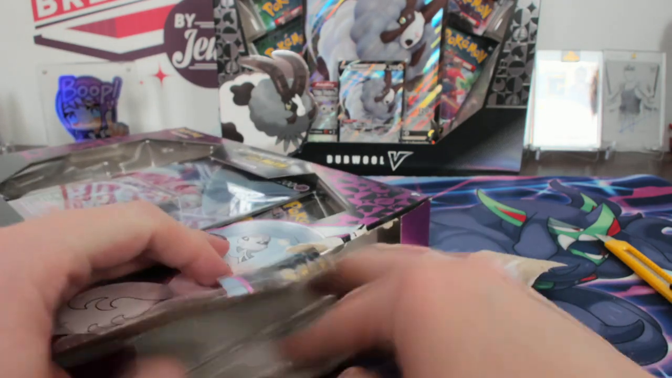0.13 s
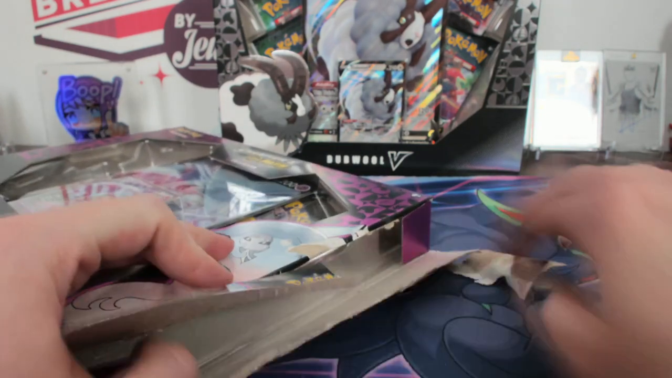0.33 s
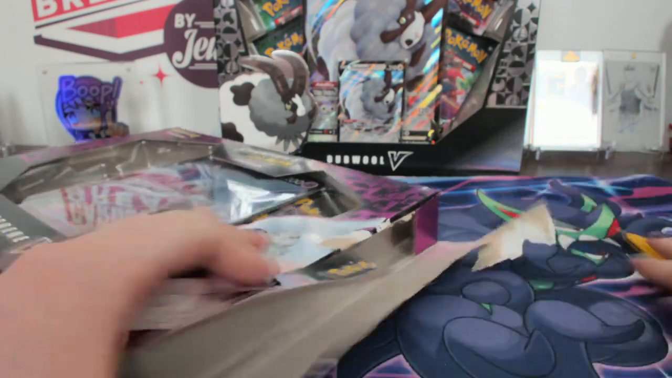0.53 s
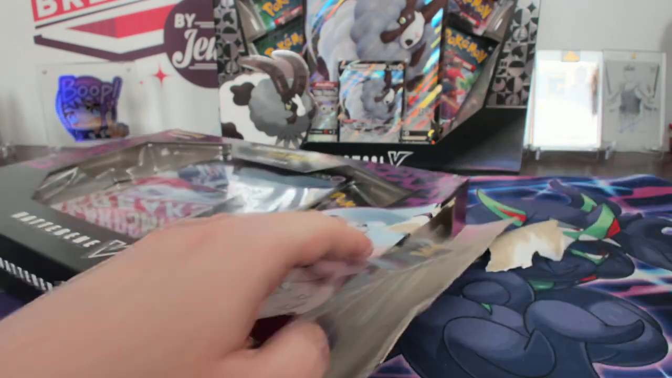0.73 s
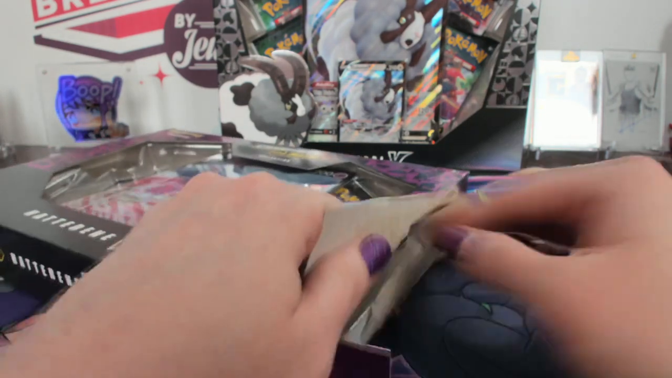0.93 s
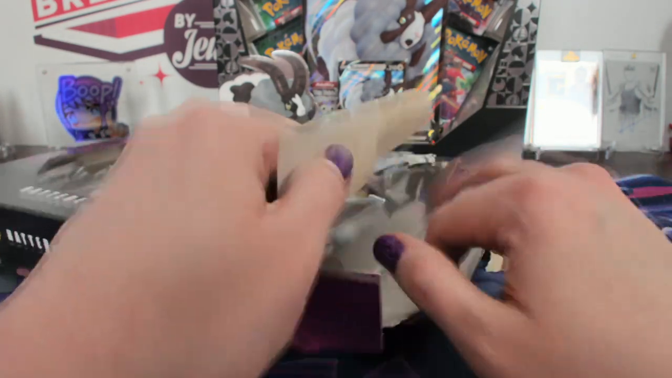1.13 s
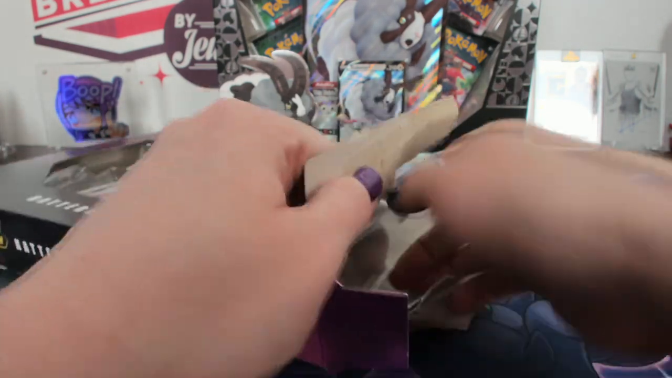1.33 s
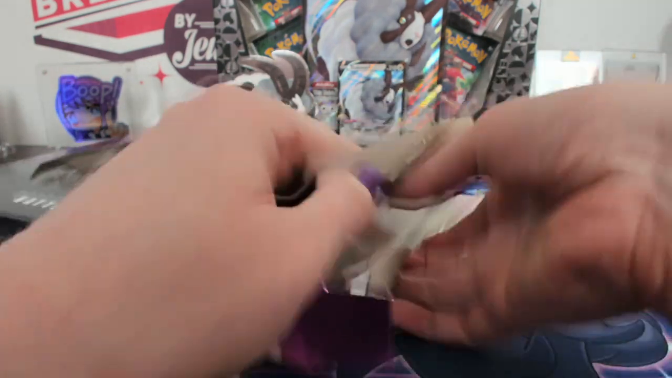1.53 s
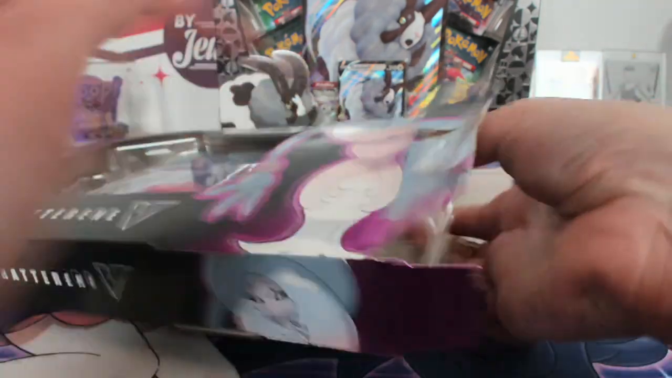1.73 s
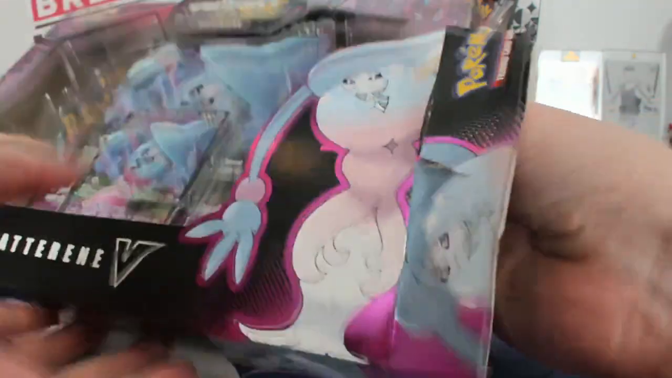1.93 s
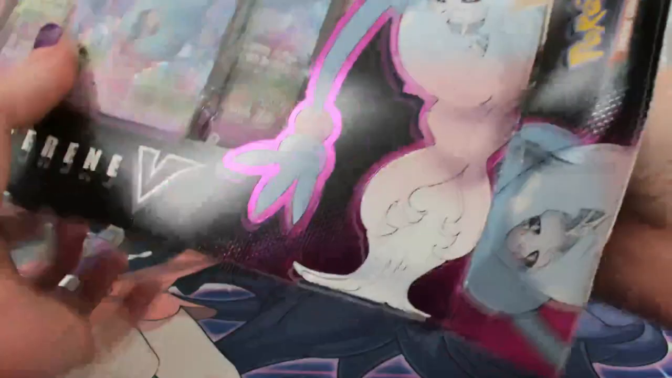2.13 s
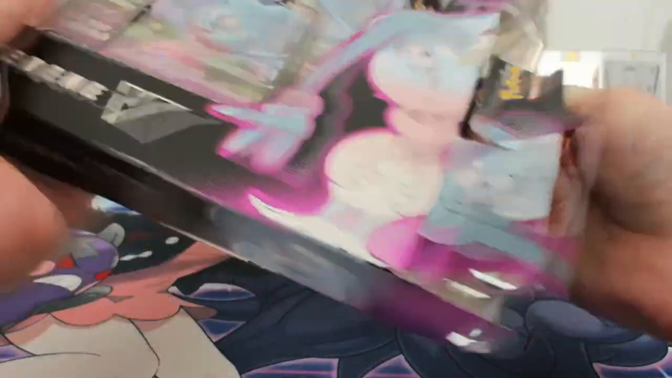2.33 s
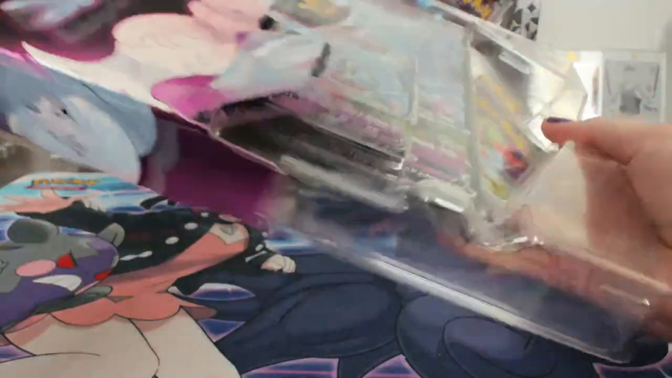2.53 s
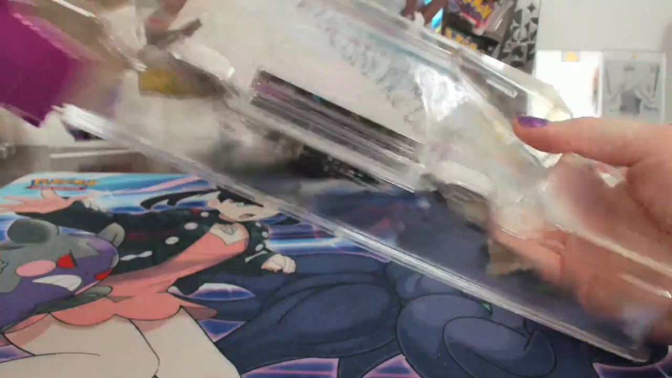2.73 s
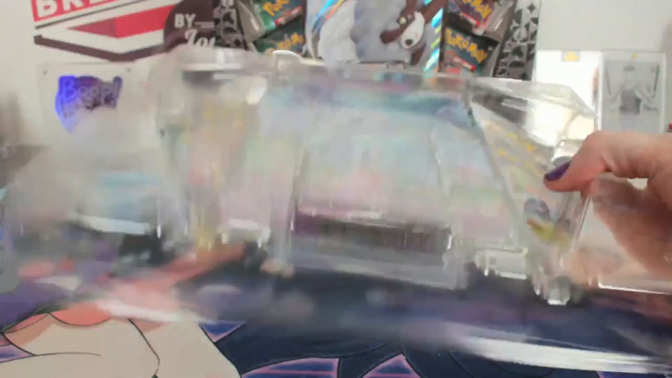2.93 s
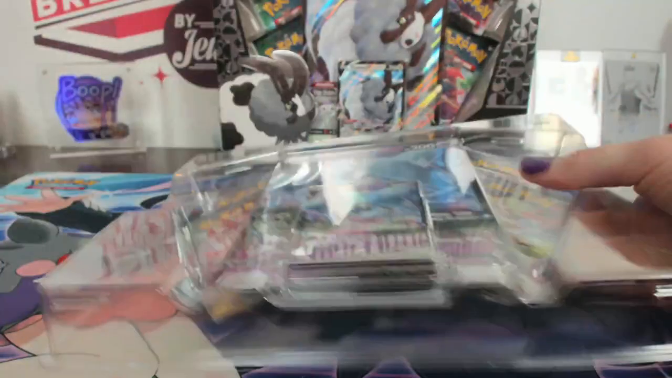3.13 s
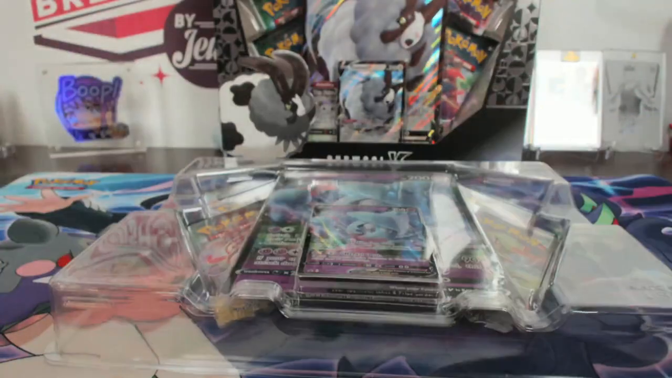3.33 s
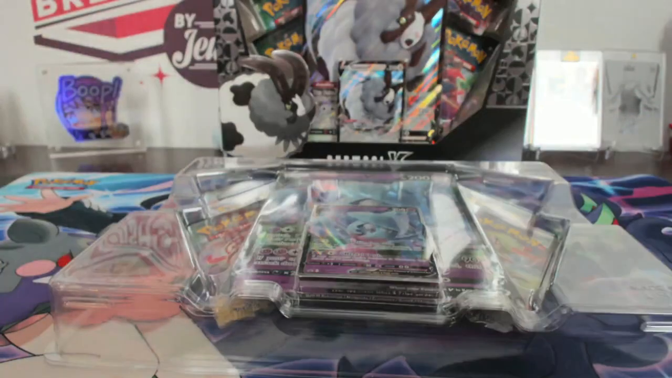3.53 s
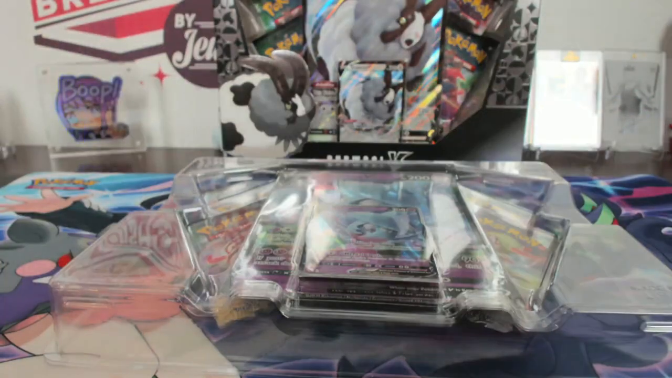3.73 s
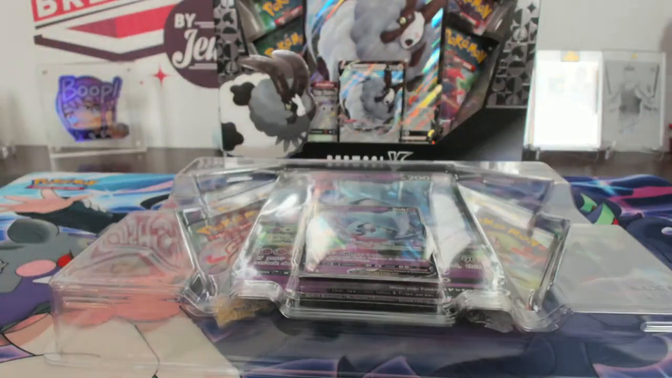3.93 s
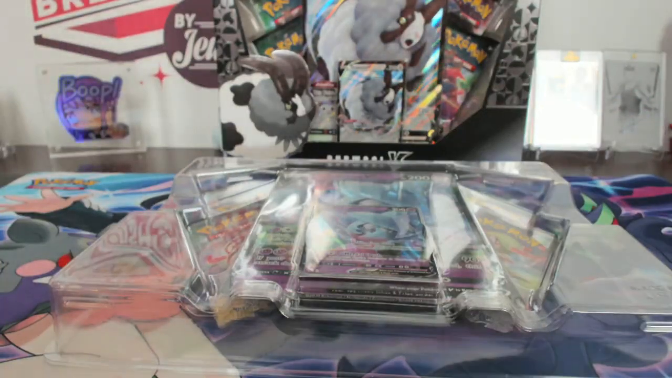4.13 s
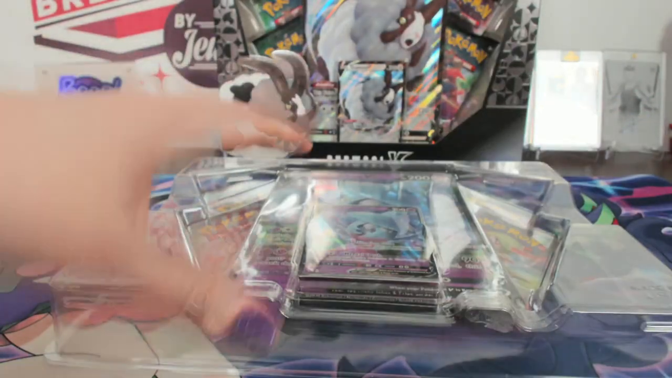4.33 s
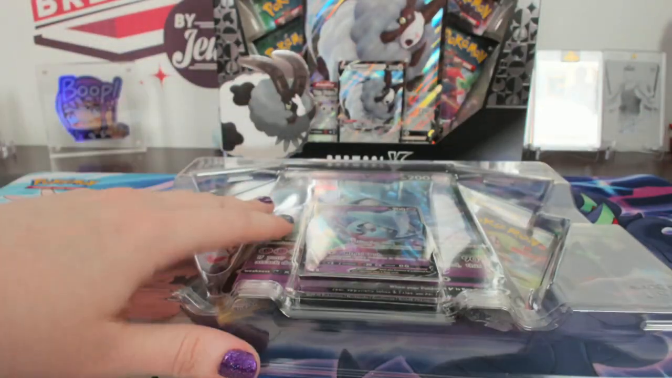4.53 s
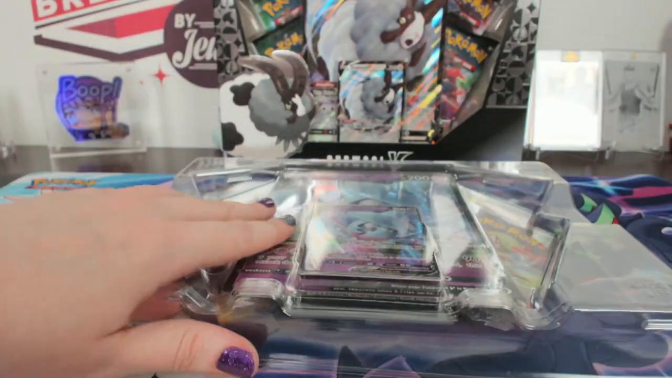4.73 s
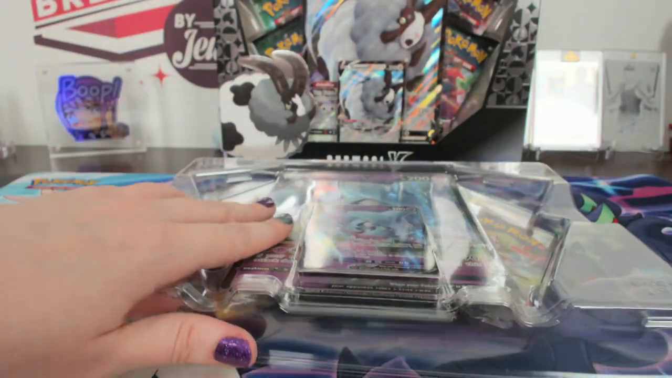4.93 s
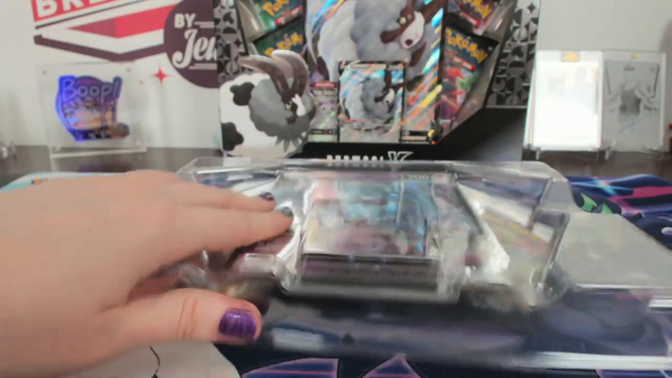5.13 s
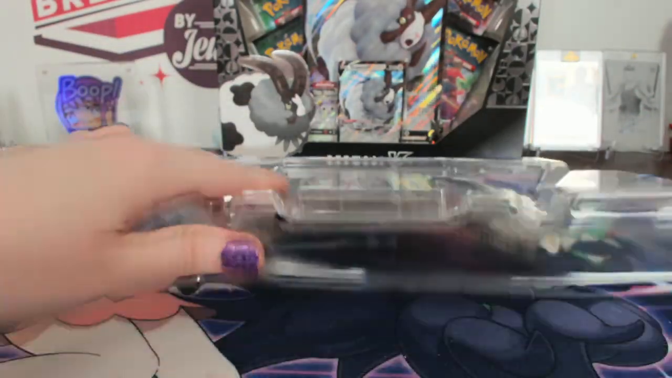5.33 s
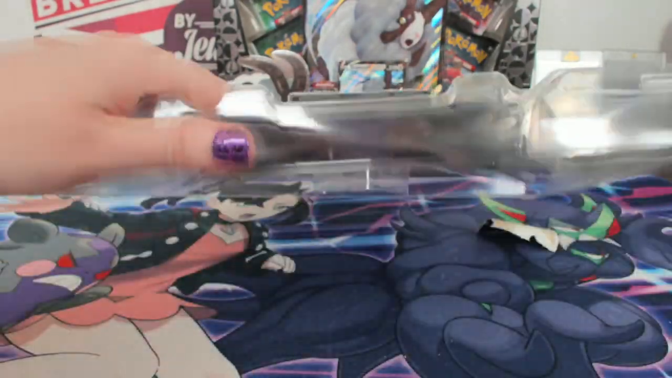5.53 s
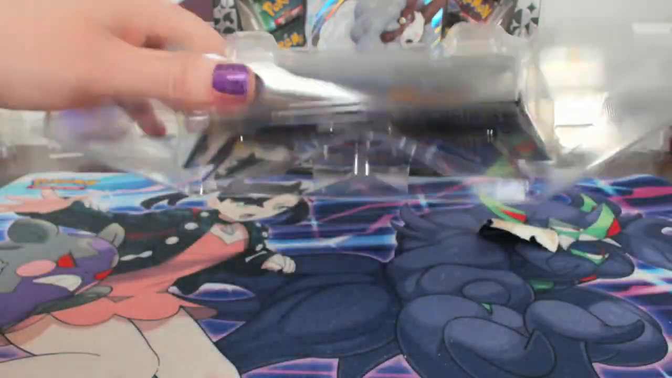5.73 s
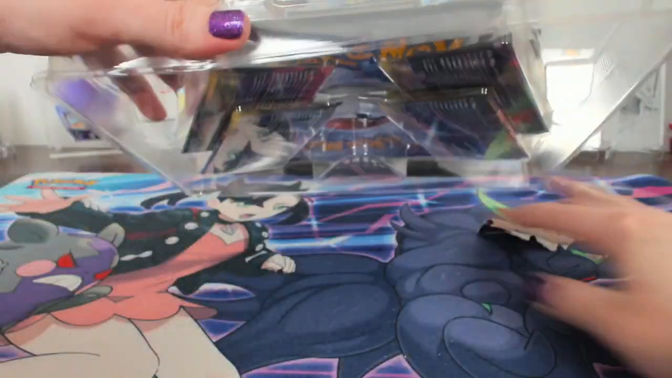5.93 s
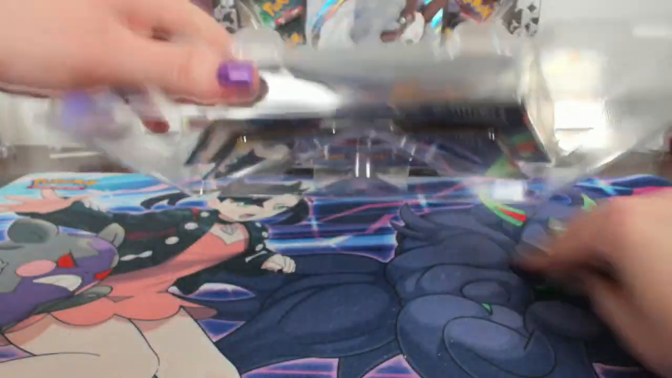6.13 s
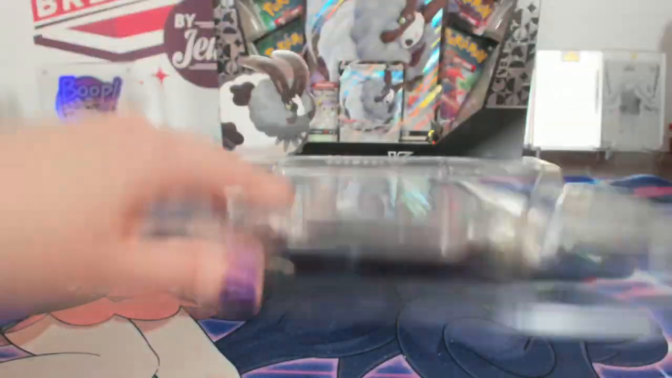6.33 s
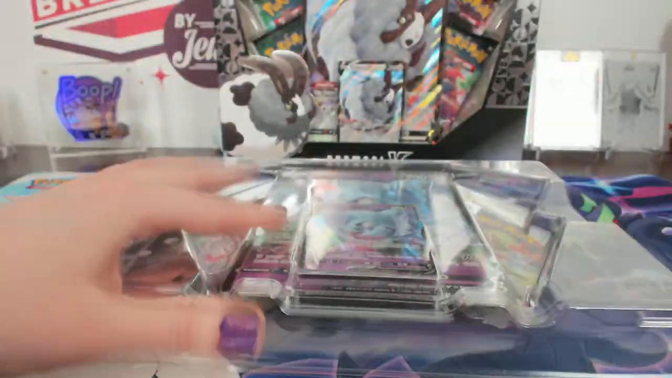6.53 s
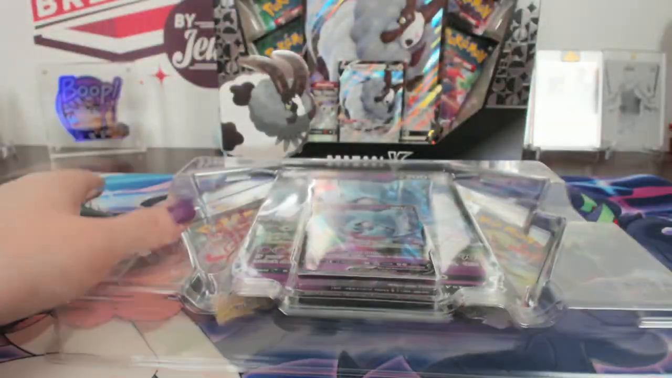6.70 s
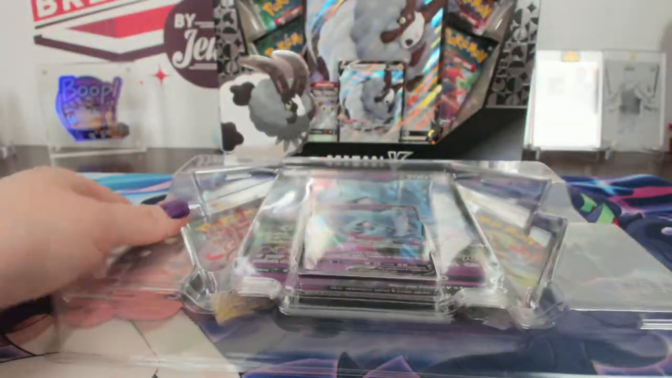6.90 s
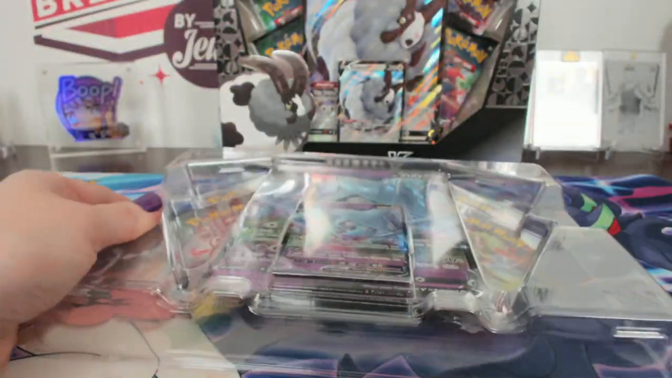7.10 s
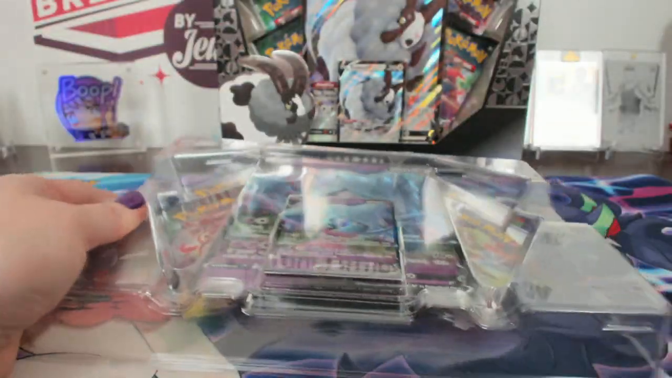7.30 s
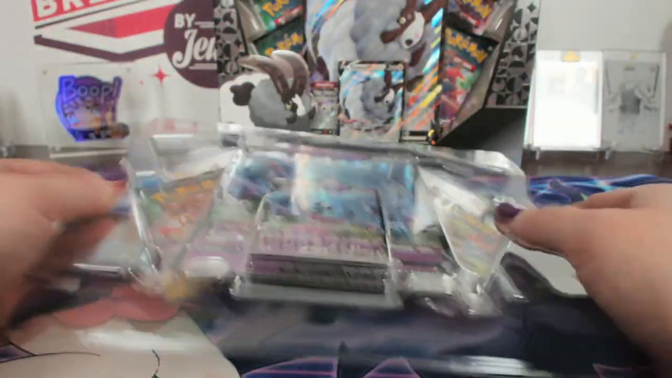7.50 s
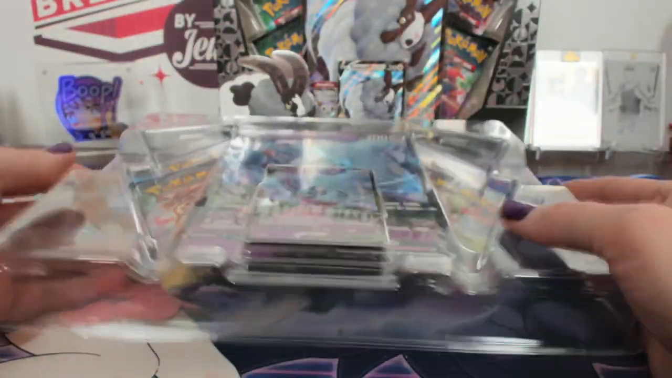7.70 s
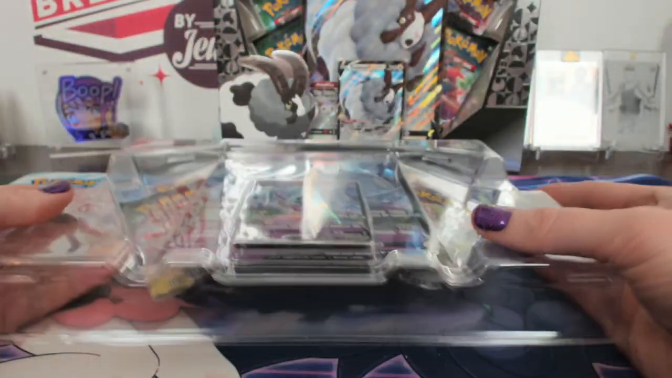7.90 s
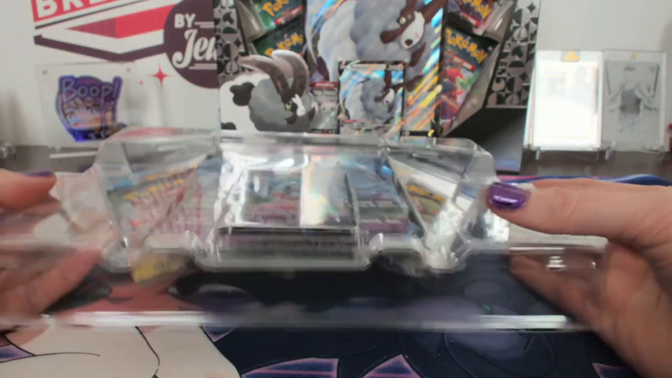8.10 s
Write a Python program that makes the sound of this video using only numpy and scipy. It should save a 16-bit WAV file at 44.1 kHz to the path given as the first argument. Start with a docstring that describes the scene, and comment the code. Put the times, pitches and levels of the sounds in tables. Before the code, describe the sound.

Close handling of packaging: glued card crackles, stiff board pops, a plastic tray rasps free, drops on a padded table, then crinkles under fingers.

```python
"""Small room, padded table, one close microphone: a cardboard box is opened.
Its glued flap peels as a dense fibre crackle; a thin plastic tray scrapes out through the box's resonances.
The tray is set down, lifted, dropped back and gripped: filtered slip noise rubs, brief modes and noise snap,
pitched pops crinkle and tick, short noise bursts click. Bumps ring the table's damped modes with a dead thud.
Lurching low-passed rumble and faint room noise lie beneath."""
import sys
import numpy as np
from scipy import signal
from scipy.fft import rfft, irfft, next_fast_len
from scipy.io import wavfile
from scipy.ndimage import uniform_filter1d, map_coordinates

SR = 44100
rng = np.random.default_rng(int(sys.argv[2]) if len(sys.argv) > 2 else 0)


def file_out(sig):
    """Save sig as 16-bit WAV at sys.argv[1]."""
    # one column per channel
    cols = np.atleast_2d(sig).T
    # limit, then scale
    lim = np.clip(cols, -1, 1)
    pcm = np.round(lim * 32767).astype(np.int16)
    wavfile.write(sys.argv[1], SR, pcm)


N = 359856

# Flap peeling off its glue: (time [s], level [dB])
PEEL_LEVEL = [(0.36, -81), (0.39, -48), (0.43, -50.5), (0.47, -43), (0.53, -38.5), (0.58, -44.5),
              (0.66, -50.5), (0.76, -61), (0.86, -71)]
# Glue seam spectrum: (frequency [Hz], relative density [dB per Hz])
GLUE_SPECTRUM = [(120, -21.5), (267, 2), (355, -10), (503, 0.5), (580, -14.5), (1370, -2.5), (3660, -12),
                 (4980, -8.5), (9790, -14), (16000, -20.5)]
# Tray sliding out: (time [s], panel gain [dB], scrape level [dB])
SLIDE_LEVELS = [(2.24, -49, -87), (2.26, -47, -50), (2.348, -38, -39.5), (2.436, -36.5, -32.5),
                (2.572, -39.5, -40), (2.806, -38.5, -37.5), (2.846, -36.5, -46), (2.99, -93, -123)]
# Box panel spectrum under the slide: (frequency [Hz], relative density [dB per Hz])
PANEL_SPECTRUM = [(59, -26.5), (130, -16.5), (239, -9.5), (406, -9.5), (621, 1), (784, 1.5), (1130, 4.5),
                  (2690, -10.5), (4200, -20.5), (10500, -15.5), (16000, -28.5)]
# Panel note, shifting as the sliding tray loads it: (time [s], frequency [Hz])
PANEL_NOTE_HZ = [(2.3, 1043), (2.387, 1255), (2.499, 1162), (2.68, 1059), (2.773, 1340), (2.88, 1160)]
# Box resonances as the tray rubs it: (centre [Hz], width [Hz], boost [dB])
BOX_RESONANCES = [(453, 39, 4), (621, 98, 1), (2040, 480, 7), (4210, 260, 9), (5050, 1500, 8.5)]
# Fingers rubbing card: (start [s], length [s], level [dB], hollowness [dB], brightness [dB])
CARD_RUBS = [(0.0, 0.032, -58, 4.5, -21), (0.135, 0.011, -64.5, -4, 4), (0.69, 0.055, -57, -31, 2.5),
             (0.855, 0.0094, -62.5, 3, -4), (0.99, 0.43, -55.5, 2.5, -5.5), (1.3, 0.26, -53.5, 4, -16),
             (1.48, 0.21, -50.5, -9.5, -10.5), (1.74, 0.15, -49, 2.5, -14), (1.89, 0.15, -47.5, 1.5, -13.5),
             (2.11, 0.092, -48.5, 1, -16.5)]
# Rubbed card spectrum: (frequency [Hz], relative density [dB per Hz])
CARD_SPECTRUM = [(71, -38.5), (120, -13), (261, -1.5), (370, -6), (493, -0.5), (822, -1), (1320, -0.5),
                 (1720, -11), (2750, -24), (4880, -8.5), (6500, -28), (8840, -16.5), (11100, -22.5),
                 (16000, -40)]
# Fingers rubbing plastic: (start [s], length [s], level [dB], hollowness [dB], brightness [dB])
PLASTIC_RUBS = [(3.03, 0.29, -49, -7, -15), (3.14, 0.065, -40.5, -6, -7), (3.595, 0.02, -51.5, -14, -23.5),
                (4.33, 0.038, -57.5, -1.5, -13.5), (4.56, 0.3, -66.5, -2, -12),
                (4.735, 0.042, -49.5, -5.5, -12.5), (4.89, 0.17, -59.5, -1, -27),
                (5.23, 0.12, -53.5, 0, -16), (5.39, 0.14, -43, 0.5, -15.5), (5.56, 0.17, -65.5, -10, -29),
                (5.75, 0.056, -42, 3.5, -28), (5.85, 0.16, -64, -4, -1), (6.07, .19, -51, -5.5, -2),
                (6.22, 0.28, -54.5, -7.5, -15), (6.73, 0.13, -66.5, 9, -21.5), (6.87, 0.1, -59.5, 5.5, -20),
                (6.965, 0.04, -48.5, -1, -2), (7.06, 0.3, -48.5, -2.5, -8), (7.44, 0.075, -49.5, 0, -8),
                (7.58, 0.14, -59.5, -1.5, -8), (7.74, 0.087, -66.5, 0.5, -9.5), (7.85, 0.3, -66, 4.5, -18)]
# Plastic under the fingers: (frequency [Hz], relative density [dB per Hz])
PLASTIC_SPECTRUM = [(70, -11.5), (262, -2), (368, -5), (494, -1), (560, -6.5), (780, 0), (1250, 0.5),
                    (2100, -13), (2720, -23), (4800, -12.5), (6900, -30), (8860, -18), (11000, -24.5),
                    (16000, -39.5)]
# Tray walls relaxing once let go: (start [s], length [s], level [dB], hollowness [dB], brightness [dB])
RELAXATIONS = [(3.683, 0.21, -51, -7, -5.5), (4.054, 0.12, -64.5, -9.5, -2.5)]
# Free tray walls: (frequency [Hz], relative density [dB per Hz])
RELAXED_SPECTRUM = [(100, -37), (400, -2), (700, -25), (1400, 0.5), (3600, -17), (7000, -29), (8700, -24),
                    (16000, -52)]
# Tray wall resonances: (centre [Hz], width [Hz], boost [dB])
WALL_RESONANCES = [(1360, 99, 4.5), (2080, 240, 6)]
# Sheets buckling or tapped: (time [s], level [dB], hollowness [dB], brightness [dB])
SNAP_EVENTS = [(0.539, -41, 2, 1.5), (0.912, -47, 2.5, -2), (0.978, -53, 10, -4), (1.133, -53, 8, -22),
               (1.263, -34.5, 2, -5.5), (1.431, -26.5, -4.5, -7), (1.457, -27.5, -21, -0.5),
               (1.571, -34, 3.5, -3.5), (1.63, -46, 6.5, 0.5), (1.651, -44, 2.5, 1),
               (1.9582, -45.5, -2, -16), (2.018, -34, 0.5, -10), (2.249, -54.5, 18, -22),
               (2.261, -35, -2, -15), (2.837, -31.5, -5, -5.5), (3.161, -38.5, -8, -1.5),
               (3.234, -37, -1, -9.5), (3.278, -36, 3.5, -15.5), (6.196, -46.5, 1.5, -11),
               (6.407, -50, 7, -9), (6.532, -49, 5.5, -11.5), (6.992, -37.5, -7, -19),
               (8.026, -33.5, -17.5, -8.5), (8.083, -34.5, -4.5, -5.5)]
# Short catches and drags: (strongest moment [s], level [dB], hollowness [dB], brightness [dB], build-up [s])
SCUFF_EVENTS = [(1.074, -56.5, 14.5, 4.5, 0.011), (1.207, -45.5, -13, -15, 0.017),
                (1.797, -46, -5, -11, 0.024), (2.424, -34, 0.5, -10, 0.029), (3.035, -48, 9, -4, 0.0041),
                (3.66, -39.5, -24, -7.5, 0.0047), (3.787, -52, -9, 1.5, 0.0061),
                (4.318, -50, -12, -6.5, 0.0056), (4.505, -62, 10, -23, 0.0038),
                (4.732, -56, -6.5, -4, 0.0033), (4.96, -50, -11, -25.5, 0.008),
                (5.193, -36, -3.5, -24.5, 0.013), (5.472, -41, -3, -8.5, 0.0066),
                (5.757, -34, -4.5, -31, 0.015), (6.05, -56.5, -19, 8.5, 0.0072),
                (6.726, -59.5, 11.5, -13.5, 0.0032), (7.028, -39.5, -9.5, -14, 0.027),
                (7.145, -44, -2, -9.5, 0.017), (7.54, -47, 2, -10, 0.014), (7.661, -55.5, 10, -3.5, 0.0071)]
# Briefly pushed sheet spectrum: (frequency [Hz], relative density [dB per Hz])
BUCKLE_SPECTRUM = [(59, -44.5), (100, -16), (389, -5.5), (502, -0.5), (784, -3.5), (1080, 2), (1830, -10.5),
                   (2130, -7.5), (3050, -21.5), (4670, -20.5), (10700, -30.5), (16000, -40.5)]
# Single creases popping: (time [s], peak [dB], pitch [Hz])
TICK_EVENTS = [(0.279, -51.5, 570), (0.8475, -42, 1610), (0.921, -41, 5750), (1.131, -49, 3020),
               (1.175, -42, 8740), (1.236, -40.5, 1830), (1.3934, -43, 2270), (3.494, -65, 1164),
               (3.7536, -43.5, 1930), (4.029, -51, 1670), (4.089, -42, 1640), (4.158, -46.5, 4700),
               (4.26, -59, 3050), (4.3313, -38.5, 11930), (5.0856, -43, 1390), (7.0226, -34, 3280)]
# Edge slipping past another: (time [s], peak [dB], centre [Hz])
CLICK_EVENTS = [(0.5395, -19, 8000), (0.5448, -17.5, 6000), (2.611, -19.5, 4050), (3.13, -24, 5900),
                (3.203, -24.5, 12000), (3.233, -20.5, 7000), (6.992, -31.5, 4500), (7.349, -26.5, 4630)]
# Load bumping on the table: (time [s], peak [dB], hardness as cut-off [Hz], rise [s])
BUMP_EVENTS = [(0.911, -28, 297, 0.0017), (1.455, -21, 627, 0.0033), (2.264, -34, 700, 0.0031),
               (2.262, -40, 109, 0.0045), (3.212, -26, 229, 0.0021), (3.282, -18, 272, 0.0018),
               (3.3, -20, 249, 0.0013), (3.659, -34.5, 83.5, 0.0013), (3.699, -34, 143, 0.0016),
               (5.178, -18, 113, 0.006), (5.225, -21, 102, 0.0023), (5.399, -32.5, 257, 0.0018),
               (5.45, -29, 129, 0.014), (6.405, -22.5, 265, 0.0043), (6.426, -29, 151, 0.0035)]
# Modes of table and loaded tray: (frequency [Hz], mean strength [dB], T60 [s])
TABLE_MODES = [(72.7, 0, 0.2), (110, -11.5, 0.39), (125, 1.5, 0.14), (158.5, -6, 0.18), (263.8, 1, 0.15),
               (331, -8.5, .15), (439, -11, 0.24), (501.5, 4, 0.15), (614, 1, 0.039)]
# Table rumble: (time [s], level [dB])
RUMBLE_LEVEL = [(0.0, -72), (0.28, -56.5), (0.79, -76), (1.7, -41), (2.0, -57), (2.7, -66.5), (3.27, -45),
                (3.66, -55), (4.0, -68), (4.53, -54), (5.05, -70.5), (5.2, -49.5), (6.45, -55.5),
                (8.16, -52)]
# Rumble spectrum: (frequency [Hz], relative density [dB per Hz])
RUMBLE_SPECTRUM = [(16, 10.5), (28, 0), (100, -14.5), (170, -33.5), (400, -74.5)]
# Still room spectrum: (frequency [Hz], relative density [dB per Hz])
QUIET_SPECTRUM = [(20, 27), (400, -2.5), (1300, -16.5), (3000, -37), (16000, -26)]
# Late room decay: (frequency [Hz], T60 [s])
ROOM_T60 = [(100, 0.17), (300, 0.3), (1000, 0.18), (4500, 0.23), (13000, 0.14)]

RUB_ATTACK_S, RUB_RELEASE_T60_S = 0.012, 0.28
CRACK_T60_S = 0.009
TOP_HZ = 16200


def peel():
    """Paper fibres part in a dense crackle along the glue seam."""
    fibres = friction(rate_hz=2000, spread_db=5.5, smooth_db=-4.5, patchy_db=0.0, wet_db=-5.0)
    return gains(PEEL_LEVEL)[0] * unit(shaped(fibres, GLUE_SPECTRUM))


def slide(note_db=-5, wall_db=1.5, grit_db=-6):
    """The tray's rim scrapes grittily along the card, which sounds through the box's resonances."""
    panel_gain, scrape_gain = gains(SLIDE_LEVELS)
    rub = friction(rate_hz=3500, spread_db=4, smooth_db=-5, patchy_db=1.4, wet_db=-3)
    grit = amp(grit_db) * crinkle(rate_hz=900, low_hz=2600, high_hz=15000, cycles=35)
    hollow, wall, creases = registers(resonances(rub + grit, BOX_RESONANCES), PANEL_SPECTRUM)
    panel = amp(wall_db) * unit(hollow + wall) + amp(note_db) * panel_note()
    return panel_gain * panel + scrape_gain * unit(creases)


def panel_note(width_hz=110):
    """The scraped panel's main resonance: a narrow noise band that follows its note."""
    hz = np.interp(np.arange(N) / SR, *np.transpose(PANEL_NOTE_HZ))
    phase = 2 * np.pi * np.cumsum(hz) / SR
    low_pass = signal.butter(2, width_hz / 2, fs=SR, output="sos")
    in_phase, quadrature = signal.sosfilt(low_pass, rng.standard_normal((2, N)))
    return unit(in_phase * np.cos(phase) + quadrature * np.sin(phase))


def grip(rubs, spectrum, slips, clump_db=1.3):
    """A sheet rubs under pressure, its grip wavering; each rub sets the level of three registers."""
    stick = amp(clump_db * wander(SR // 45))
    t = np.arange(N) / SR
    power = np.zeros((3, N))
    for start_s, length_s, level_db, hollow_db, bright_db in rubs:
        near = (t > start_s) & (t < start_s + length_s + 0.5)
        age_s = t[near] - start_s
        attack = 1 - np.exp(-age_s / RUB_ATTACK_S)
        release = decay(np.maximum(age_s - length_s, 0), RUB_RELEASE_T60_S)
        register_gains = amp(level_db + np.array([hollow_db, 0, bright_db]))
        power[:, near] += np.outer(register_gains, attack * release) ** 2
    parts = registers(slips * stick, spectrum)
    return sum(gain * unit(part) for gain, part in zip(np.sqrt(power), parts))


def snaps():
    """Card or plastic buckles or is tapped; every snap bends another patch of the sheet."""
    out, t = np.zeros(N + SR), np.arange(-SR // 50, SR // 10) / SR
    for time_s, level_db, hollow_db, bright_db in SNAP_EVENTS:
        sound = sheet(buckle(t), level_db + hollow_db, level_db, level_db + bright_db)
        add(out, time_s + t[0], sound)
    return out[:N]


def buckle(t, ring_t60_s=0.03, crack_db=-0.5, chatter_t60_s=0.16, chatter_db=-3, mode_spread_db=6,
           lead_in_db=-19, lead_in_s=0.0018, rebound_s=0.004, rebound_db=-7):
    """A faint noise swells just before the crack at t = 0; brief modes ring, the sheet rebounds, edges chatter."""
    count, after = 70, np.maximum(t, 0)
    hz = np.exp(rng.uniform(np.log(450), np.log(16500), (count, 1))) - 300
    strength = np.sqrt(hz) * amp(mode_spread_db * rng.standard_normal((count, 1)))
    mode_t60_s = ring_t60_s * (hz / 1000) ** -0.3
    modes = np.sin(2 * np.pi * (hz * after + rng.random((count, 1))))
    ring = np.sum(strength * modes * decay(after, mode_t60_s), axis=0)
    crack = rng.standard_normal(len(t)) * decay(after, CRACK_T60_S)
    chatter = rng.standard_normal(len(t)) * decay(after, chatter_t60_s)
    struck = lambda x: unit(x * (t > 0))
    snap = struck(ring) + amp(crack_db) * struck(crack) + amp(chatter_db) * struck(chatter)
    late = t - rebound_s * amp(rng.normal(0, 2.4))
    rebound = rng.standard_normal(len(t)) * (late > 0) * decay(np.abs(late), CRACK_T60_S)
    snap += amp(rebound_db) * unit(rebound)
    lead_in = rng.standard_normal(len(t)) * np.exp(-np.abs(t) / lead_in_s)
    return snap + amp(lead_in_db) * np.abs(snap).max() / 2 * lead_in


def scuffs(fade_t60_s=0.11, grain_db=5):
    """A cluster of slips builds up, lets go and dies away."""
    out, t = np.zeros(N + SR), np.arange(-SR // 10, SR // 10) / SR
    for time_s, level_db, hollow_db, bright_db, build_s in SCUFF_EVENTS:
        build = np.exp(-np.abs(t) / max(build_s, 1e-3))
        swell = np.where(t < 0, build, decay(np.abs(t), fade_t60_s))
        grain = amp(grain_db * unit(uniform_filter1d(rng.standard_normal(len(t)), size=50)))
        push = swell * grain * rng.standard_normal(len(t))
        add(out, time_s + t[0], sheet(push, level_db + hollow_db, level_db, level_db + bright_db))
    return out[:N]


def sheet(push, hollow_db, wall_db, crack_db, patch_db=2.5, soft_hz=1500, softening=0.37):
    """A brief push sounds through one patch of sheet and the room; loudest 20 ms set each register."""
    size, window = SR // 3, SR // 50
    level = lambda x: x / np.sqrt(uniform_filter1d(x ** 2, window).max())
    # peaks and notches, wider apart in the treble
    patch_shape = rng.standard_normal(75)
    patch = lambda hz: amp(patch_db * np.interp(np.sqrt(hz), np.arange(0, 150, 2), patch_shape))
    patched = colour(np.pad(push, (0, size - len(push))), patch)
    hollow, wall, crack = registers(patched, BUCKLE_SPECTRUM)
    # a push too soft to crack the creases also dulls the top of the wall's range
    dull_db = min(crack_db - wall_db + 3.5, 0)
    wall = colour(wall, lambda hz: amp(softening * dull_db * np.log2(np.maximum(hz / soft_hz, 1))))
    low = amp(hollow_db) * level(room(hollow, wet_db=-0.5))
    mid = amp(wall_db) * level(room(wall, wet_db=4))
    high = amp(crack_db) * level(room(crack, wet_db=-5.5))
    return low + mid + high


def ticks(ring_cycles=35, width_octaves=0.27):
    """A small crease pops and rings for a few cycles of its own pitch."""
    out, t = np.zeros(N + SR), np.arange(SR // 5) / SR
    for time_s, peak_db, pitch_hz in TICK_EVENTS:
        pop = rng.standard_normal(len(t)) * decay(t, ring_cycles / pitch_hz)
        pop = room(octave_band(pop, pitch_hz, width_octaves), wet_db=4.5)
        add(out, time_s, amp(peak_db) * pop / np.abs(pop).max())
    return out[:N]


def clicks(click_t60_s=0.0022, width_octaves=1.2, wet_db=-4):
    """An edge slips past another with one short, dry crack."""
    out, t = np.zeros(N + SR), np.arange(SR // 5) / SR
    for time_s, peak_db, centre_hz in CLICK_EVENTS:
        crack = rng.standard_normal(len(t)) * decay(t, click_t60_s)
        crack = room(octave_band(crack, centre_hz, width_octaves), wet_db)
        add(out, time_s, amp(peak_db) * crack / np.abs(crack).max())
    return out[:N]


def bumps(thud_db=-4, thud_t60_s=0.14):
    """The mat cushions each bump: the softer it is, the fewer of the table's modes answer."""
    out, t = np.zeros(N + SR), np.arange(SR // 2) / SR
    hz, mode_db, mode_t60_s = np.transpose(TABLE_MODES)[:, :, None]
    for time_s, peak_db, hard_hz, rise_s in BUMP_EVENTS:
        # a contact favours the frequencies whose period matches its own length
        match = lambda f: (f / hard_hz) ** 1.95 / np.sqrt(1 + (f / (0.92 * hard_hz)) ** 7)
        strength = amp(mode_db + rng.standard_normal(hz.shape)) * match(hz)
        modes = np.sin(2 * np.pi * (hz * t + rng.random(hz.shape)))
        ring = np.sum(strength * modes * decay(t, mode_t60_s), axis=0)
        # the loose contents shift with a dead thud
        thud = colour(rng.standard_normal(len(t)) * decay(t, thud_t60_s), match)
        onset = 1 - np.exp(-(t / max(rise_s, 1e-4)) ** 2)
        blow = room((unit(ring) + amp(thud_db) * unit(thud)) * onset, wet_db=-18.0)
        add(out, time_s, amp(peak_db) * blow / np.abs(blow).max())
    return out[:N]


def background(quiet_db=-77, lurch_db=-0.5):
    """Table rumble reaches the microphone through its stand in uneven lurches, over the still room."""
    noise = lambda spectrum: unit(shaped(rng.standard_normal(N), spectrum))
    lurch = amp(lurch_db * wander(SR // 12))
    rumble = gains(RUMBLE_LEVEL)[0] * unit(lurch * noise(RUMBLE_SPECTRUM))
    return rumble + amp(quiet_db) * noise(QUIET_SPECTRUM)


def friction(rate_hz, spread_db, smooth_db, patchy_db, wet_db):
    """Tiny uneven slips over a smooth rub; echoes are drawn afresh 12 times a second, so no pitch lingers."""
    size = 60000
    when, strength, sign, chance = rng.random((4, size))
    kept = chance < rate_hz * N / SR / size
    slips = amp(spread_db * np.minimum(-np.log(1 - strength), 4)) * np.sign(sign - 0.5) * kept
    x = unit(np.bincount((when * N).astype(int), slips, N)) + amp(smooth_db) * rng.standard_normal(N)
    # patchy gain over frequency and time
    z = signal.stft(x, nperseg=512)[2]
    field = uniform_filter1d(rng.standard_normal(z.shape), size=4, axis=0)
    field = uniform_filter1d(field, size=7, axis=1)
    x = signal.istft(z * amp(patchy_db * unit(field)), nperseg=512)[1][:N]
    out, step = np.zeros(N + SR), SR // 12
    for start in range(0, N, step):
        piece = room(np.pad(x[start:start + step], (0, 2 * step)), wet_db)
        out[start:start + len(piece)] += piece
    return unit(out[:N])


def crinkle(rate_hz, low_hz, high_hz, cycles):
    """Crackle: tiny creases pop at random, each ringing for some cycles of its own pitch."""
    count, t = int(rate_hz * N / SR), np.arange(SR // 30) / SR
    when, pitch, strength = rng.random((count, 3)).T[:, :, None]
    hz = low_hz * (high_hz / low_hz) ** pitch
    size = np.sqrt(hz) * amp(4.5 * np.minimum(-np.log(1 - strength), 3))
    pops = size * np.sin(2 * np.pi * hz * t) * decay(t, cycles / hz)
    places = (when * N).astype(int) + np.arange(len(t))
    x = np.bincount(places.ravel(), pops.ravel(), N)[:N]
    return unit(room(x, wet_db=-4))


def registers(x, spectrum, hollow_hz=630, crack_hz=2700):
    """Split a sheet's sound into its air cavity, its flexing walls and its fine creases."""
    below = lambda hz, edge_hz: 1 / (1 + (hz / edge_hz) ** 6)
    power_shares = [lambda hz: below(hz, hollow_hz),
                    lambda hz: np.abs(below(hz, crack_hz) - below(hz, hollow_hz)),
                    lambda hz: 1 - below(hz, crack_hz)]
    return [colour(x, lambda hz: amp(along(spectrum, hz)) * np.sqrt(share(hz))) for share in power_shares]


def resonances(x, peaks):
    """Raise each (centre [Hz], width [Hz], boost [dB]) peak of a body."""
    boost_db = lambda hz: sum(db / (1 + (2 * (hz - centre) / width) ** 2) for centre, width, db in peaks)
    return colour(x, lambda hz: amp(boost_db(hz)))


def room(x, wet_db, gap_s=0.0025, early_db=6, early_t60_s=0.047):
    """Direct sound, a quick flurry of echoes off the table and shelves, and a short tail from the walls."""
    hz, t, z = signal.stft(rng.standard_normal(SR // 4), SR, nperseg=256)
    late = decay(t, along(ROOM_T60, hz)[:, None])
    early = amp(early_db) * decay(t, early_t60_s)
    tail = signal.istft(z * (late + early), SR, nperseg=256)[1]
    tail *= 1 - np.exp(-(np.arange(len(tail)) / SR / gap_s) ** 2)
    return x + amp(wet_db) * signal.fftconvolve(x, tail / np.linalg.norm(tail))[:len(x)]


def amp(db):
    """Decibels to gain."""
    return 10 ** (np.asarray(db) / 20)


def decay(t, t60_s):
    """Exponential decay, 60 dB down after t60_s."""
    return amp(-60 * t / t60_s)


def unit(x):
    """Scale to rms 1."""
    return x / np.sqrt(np.mean(x ** 2) + 1e-20)


def along(points, hz):
    """Read (frequency [Hz], value) points on a log axis."""
    f, v = np.transpose(points)
    return np.interp(np.log(hz + 1), np.log(f + 1), v)


def gains(rows):
    """One gain per sample for each dB column, silent outside the rows."""
    time_s, *columns = np.transpose(rows)
    t = np.arange(N) / SR
    return [amp(np.interp(t, time_s, db, left=-150, right=-150)) for db in columns]


def wander(step):
    """Smooth random curve with one random point every step samples."""
    return map_coordinates(rng.standard_normal(N // step + 4), [np.arange(N) / step])


def colour(x, gain):
    """Causal minimum-phase filter whose magnitude is gain(Hz)."""
    size = 2 * next_fast_len(len(x) // 2 + 1024)
    cepstrum = irfft(np.log(np.maximum(gain(np.fft.rfftfreq(size, 1 / SR)), 1e-6)))
    cepstrum[1:size // 2] *= 2
    cepstrum[size // 2 + 1:] = 0
    return irfft(rfft(x, size) * np.exp(rfft(cepstrum)))[:len(x)]


def shaped(x, spectrum):
    """Filter by a (frequency [Hz], level [dB]) spectrum."""
    return colour(x, lambda hz: amp(along(spectrum, hz)))


def octave_band(x, centre_hz, width_octaves):
    """Favour a band around centre_hz, symmetric in octaves."""
    return colour(x, lambda hz: 1 / (1 + (np.log2((hz + 1) / centre_hz) / width_octaves) ** 2))


def add(out, time_s, sound):
    """Mix a sound in at time_s."""
    start = round(time_s * SR)
    sound = sound[max(-start, 0):]
    out[max(start, 0):][:len(sound)] += sound


def scene():
    """All sounds reach one microphone, which feeds both channels."""
    crackle = amp(-3) * crinkle(rate_hz=500, low_hz=2600, high_hz=15000, cycles=70)
    creaks = amp(-11) * crinkle(rate_hz=110, low_hz=280, high_hz=2400, cycles=28)
    card = friction(rate_hz=470, spread_db=6.5, smooth_db=-8.5, patchy_db=4.0, wet_db=1.5)
    card = card + crackle + creaks
    plastic = friction(rate_hz=880, spread_db=3.5, smooth_db=-11, patchy_db=3.5, wet_db=1.0)
    plastic = resonances(plastic + crackle, WALL_RESONANCES)
    box_rubs = grip(CARD_RUBS, CARD_SPECTRUM, card)
    tray_rubs = grip(PLASTIC_RUBS, PLASTIC_SPECTRUM, plastic)
    settling = grip(RELAXATIONS, RELAXED_SPECTRUM, plastic)
    mono = peel() + slide() + box_rubs + tray_rubs + settling
    mono += snaps() + scuffs() + ticks() + clicks() + bumps() + background()
    return np.array([mono, mono])


def record(dry):
    """The recorder's linear-phase low-pass cuts the band off around TOP_HZ."""
    low_pass = signal.firwin(257, TOP_HZ, window="blackman", fs=SR)
    return signal.fftconvolve(dry, low_pass[None], mode="same", axes=1)


dry = scene()
out = record(dry)
file_out(out)
```